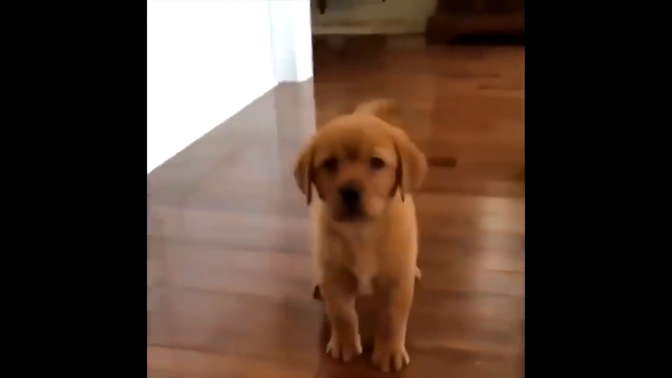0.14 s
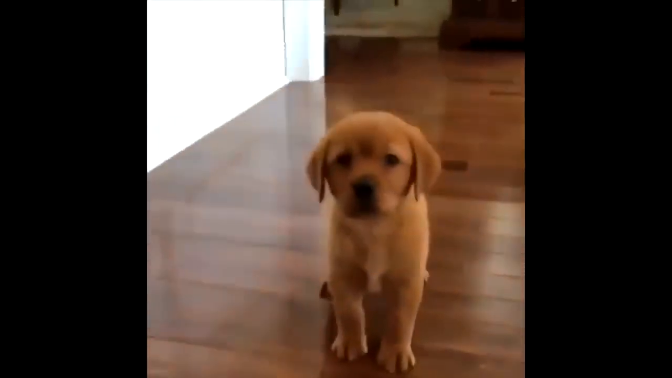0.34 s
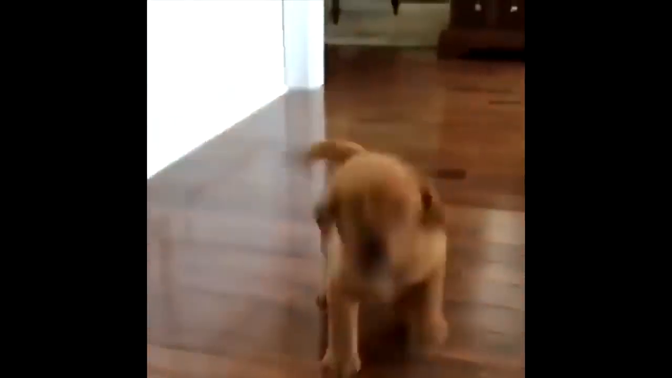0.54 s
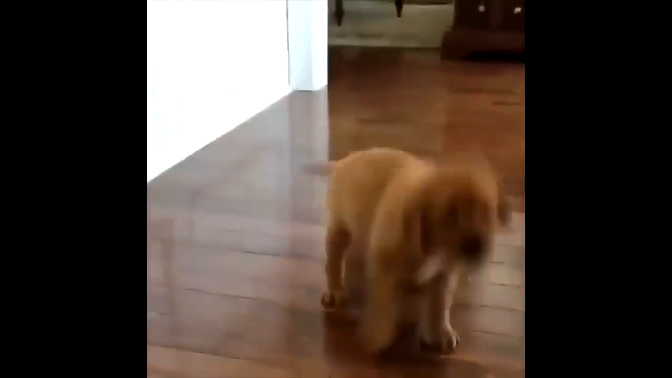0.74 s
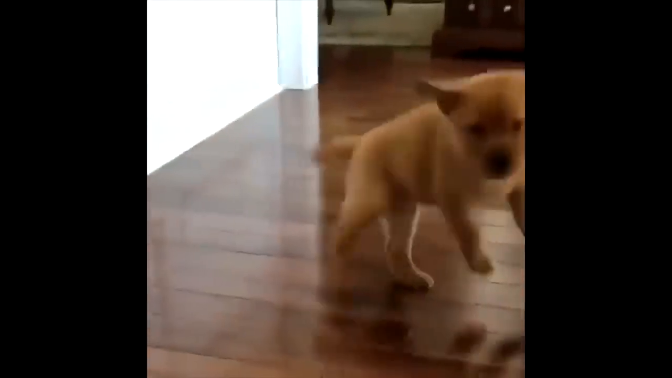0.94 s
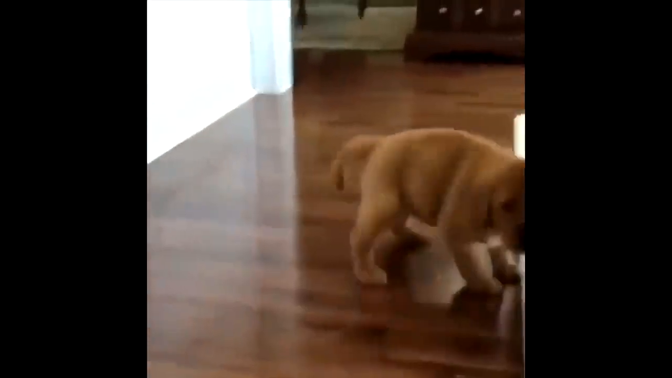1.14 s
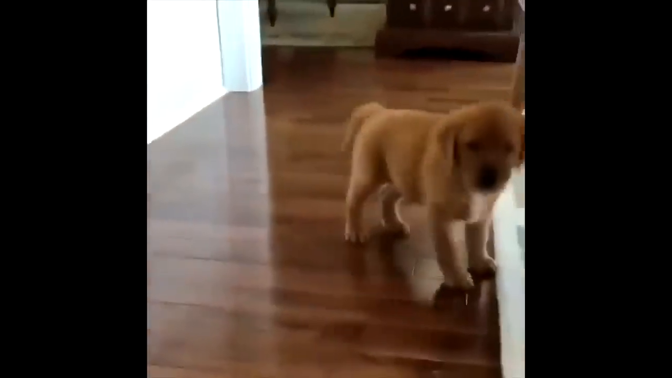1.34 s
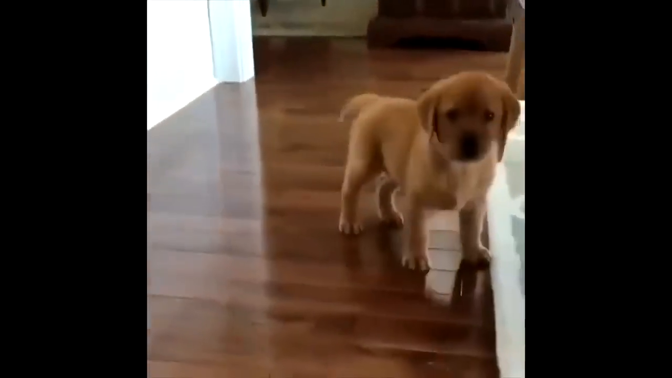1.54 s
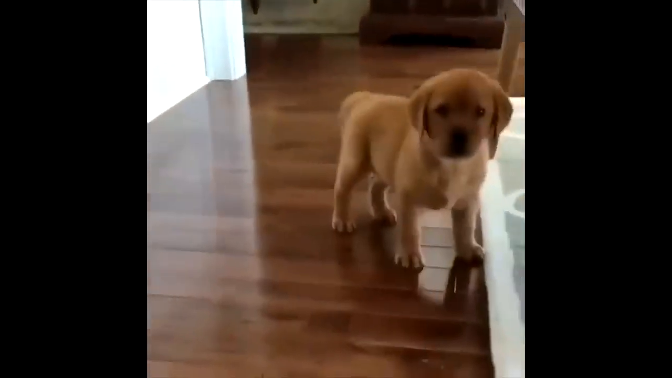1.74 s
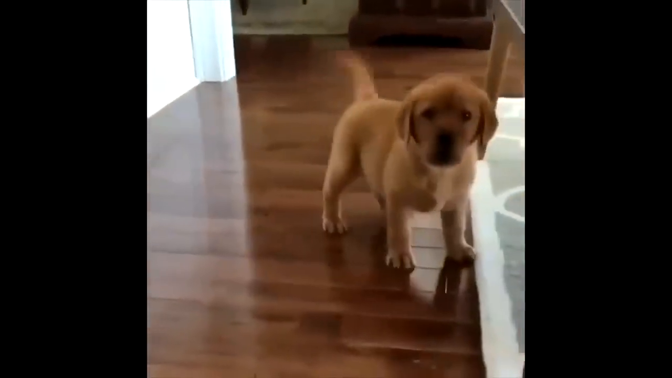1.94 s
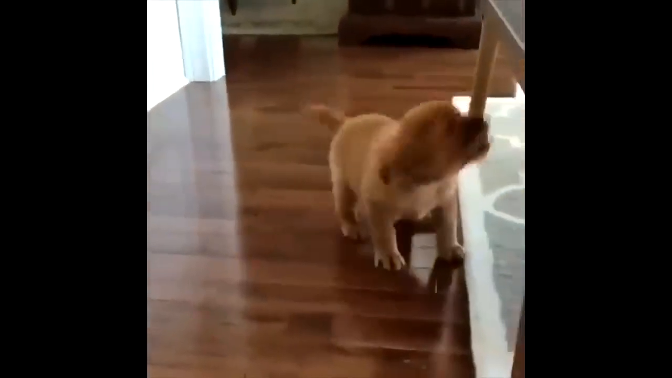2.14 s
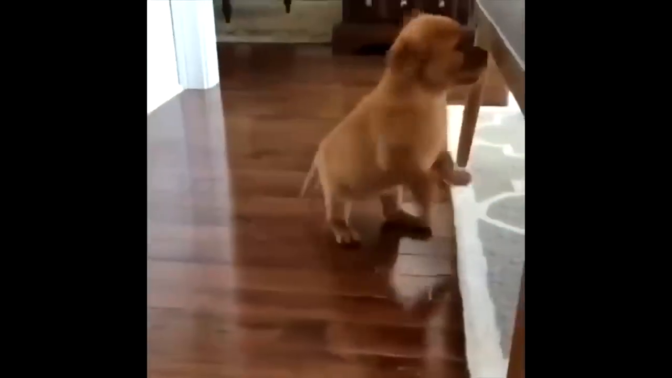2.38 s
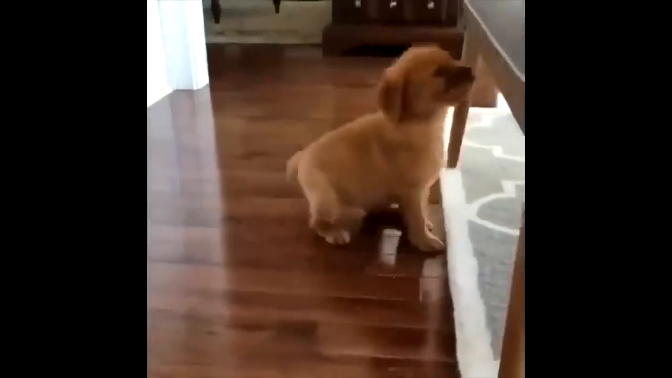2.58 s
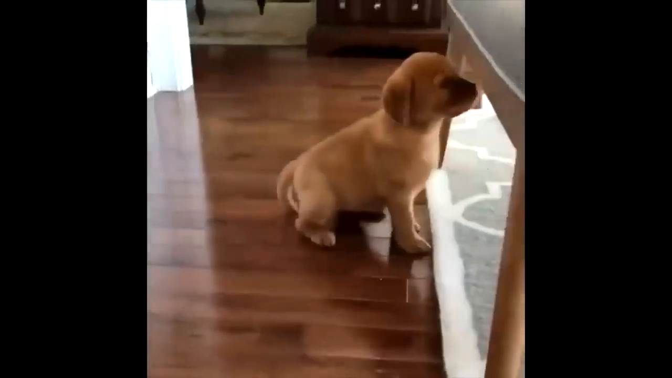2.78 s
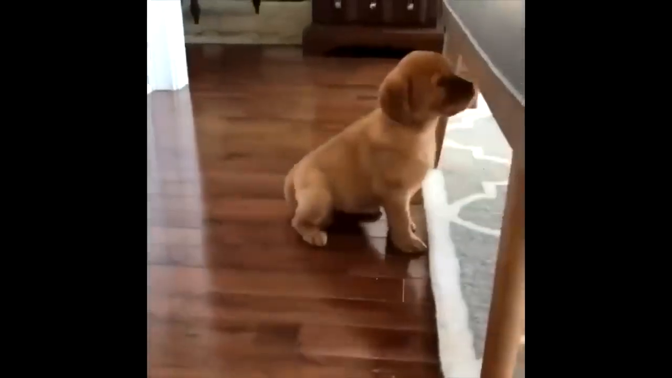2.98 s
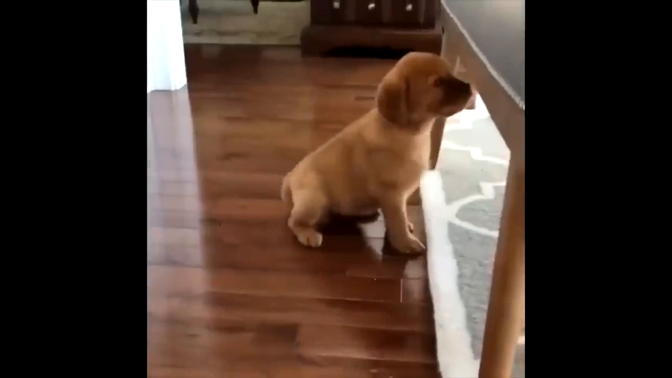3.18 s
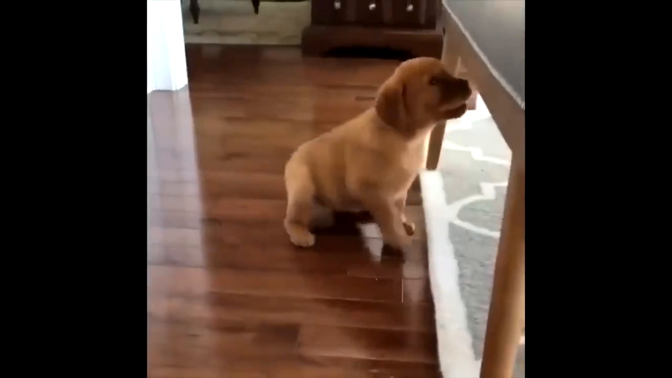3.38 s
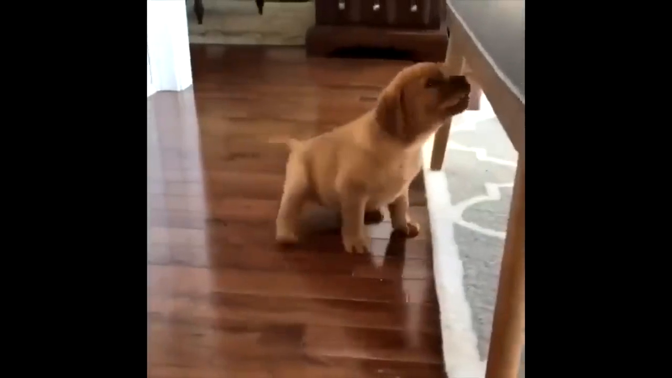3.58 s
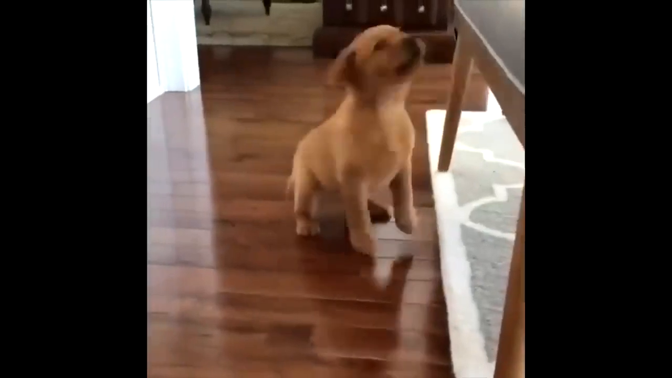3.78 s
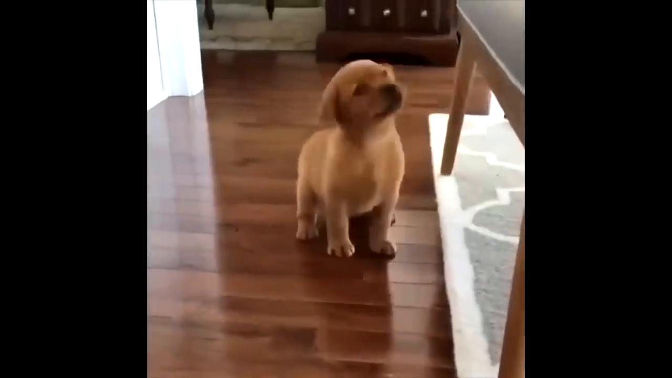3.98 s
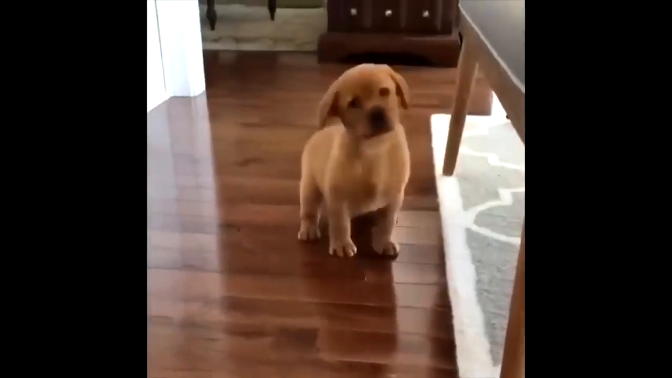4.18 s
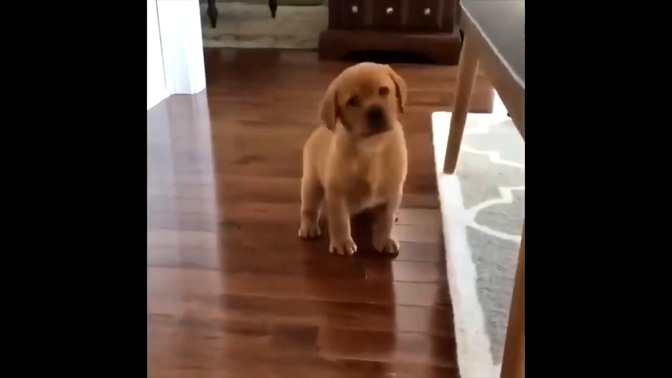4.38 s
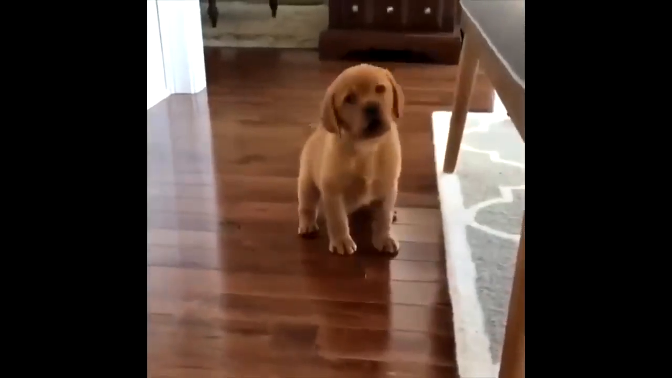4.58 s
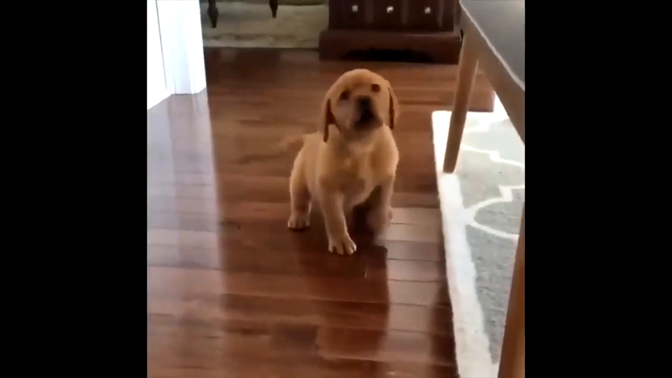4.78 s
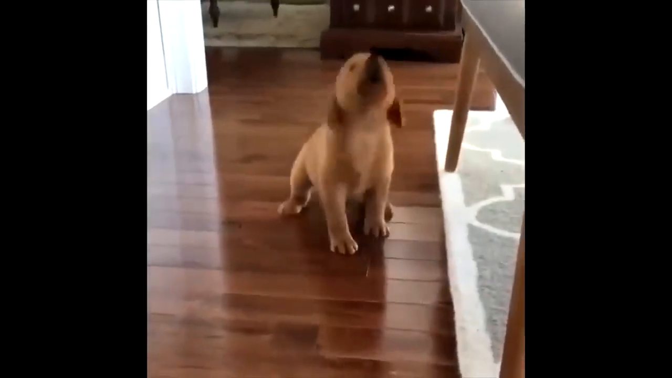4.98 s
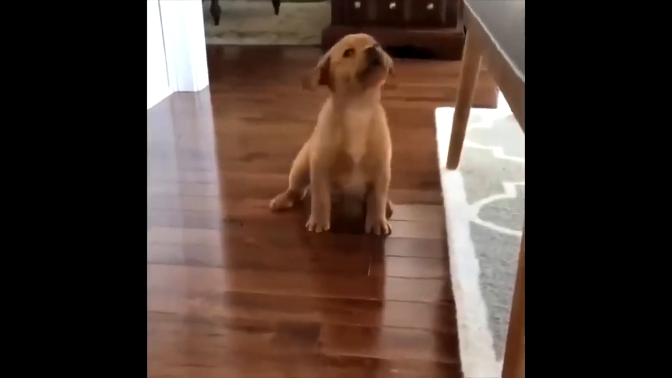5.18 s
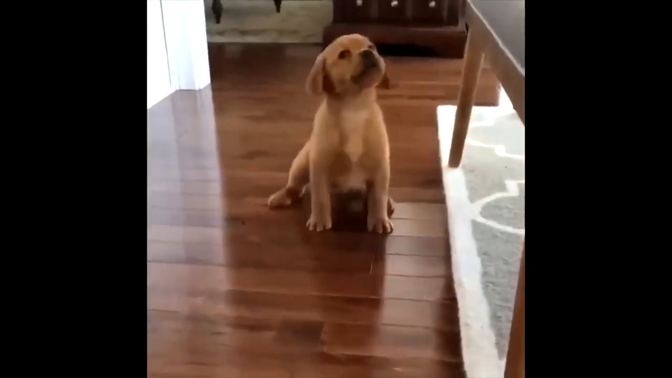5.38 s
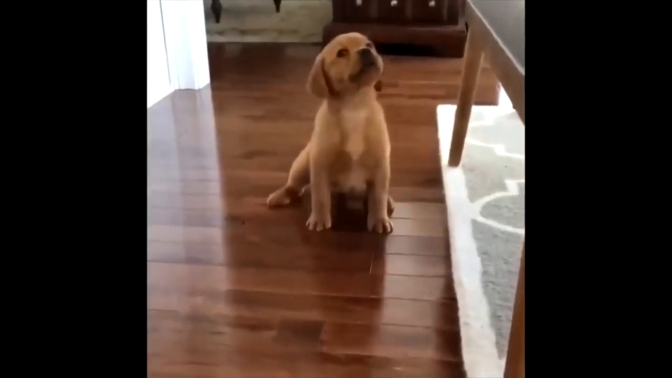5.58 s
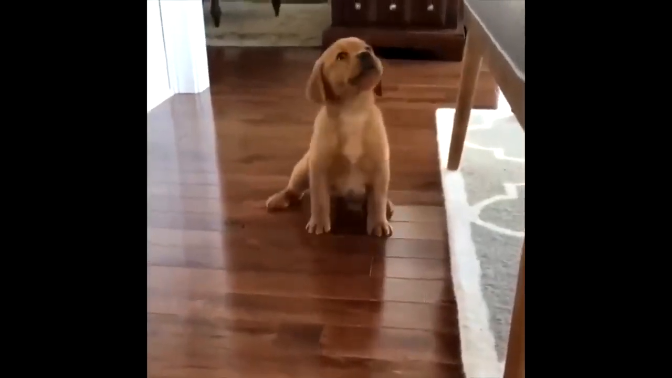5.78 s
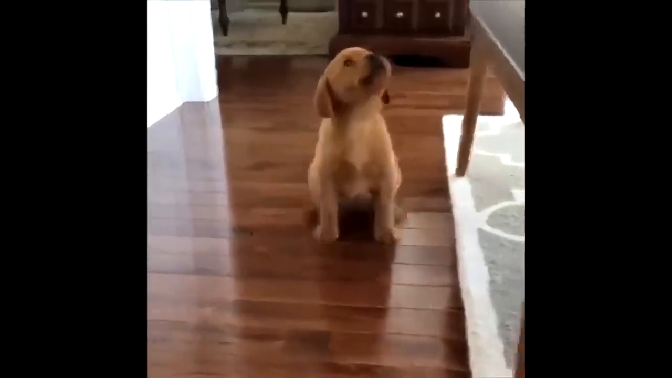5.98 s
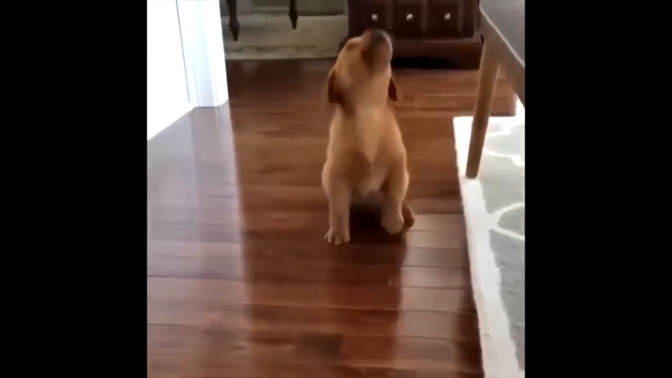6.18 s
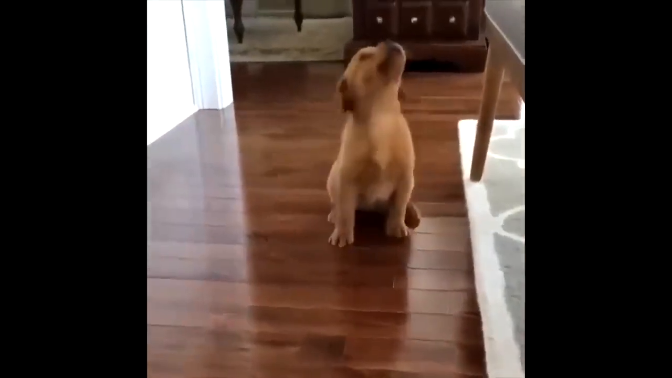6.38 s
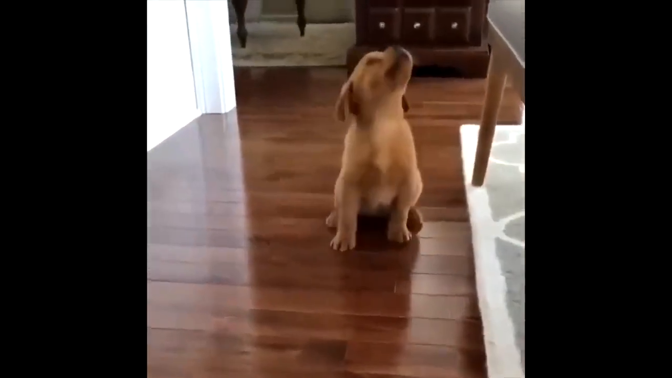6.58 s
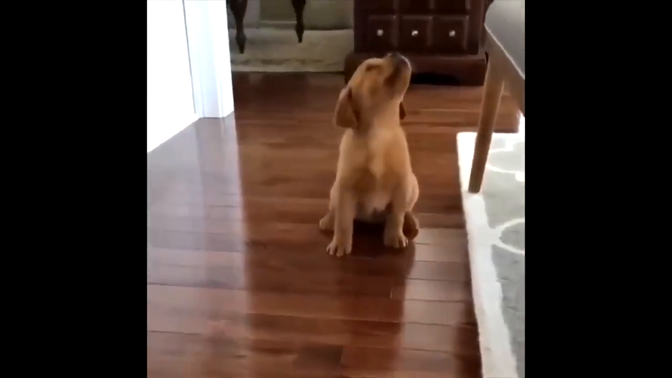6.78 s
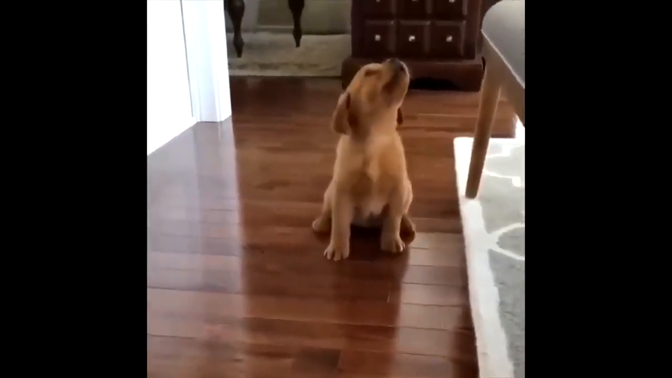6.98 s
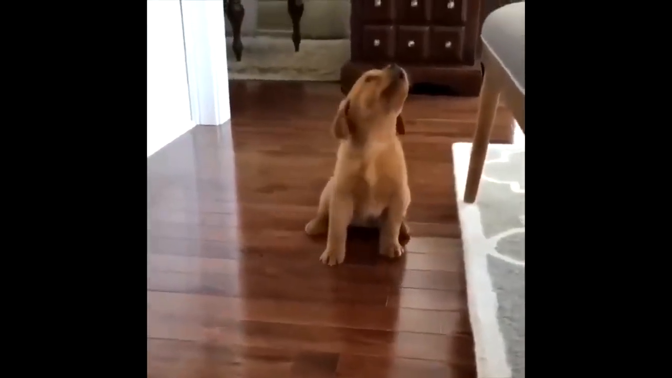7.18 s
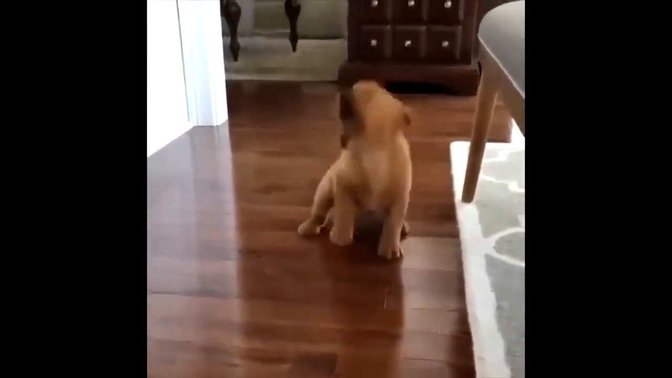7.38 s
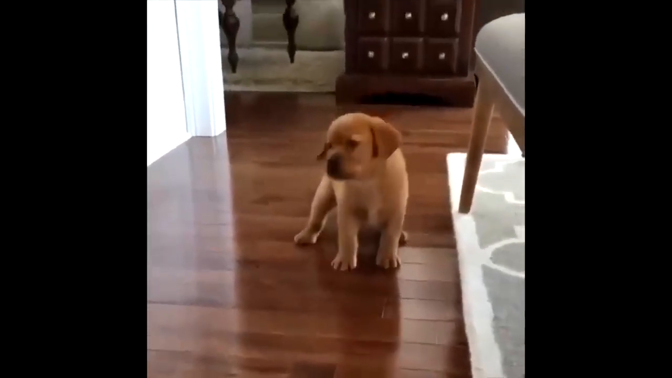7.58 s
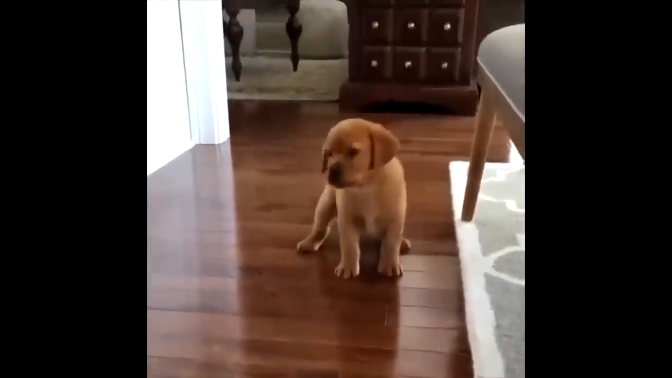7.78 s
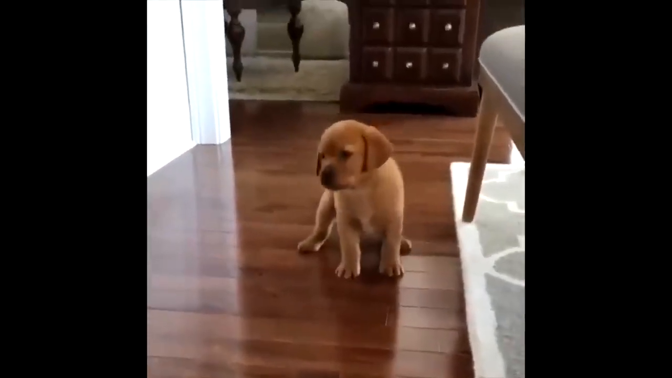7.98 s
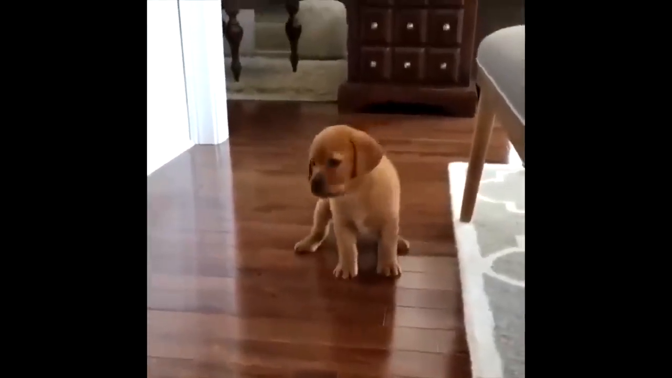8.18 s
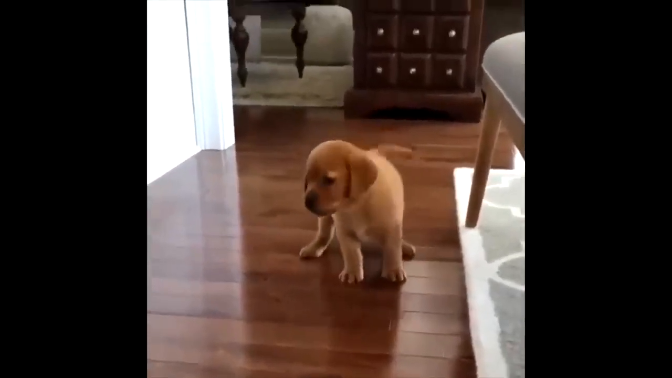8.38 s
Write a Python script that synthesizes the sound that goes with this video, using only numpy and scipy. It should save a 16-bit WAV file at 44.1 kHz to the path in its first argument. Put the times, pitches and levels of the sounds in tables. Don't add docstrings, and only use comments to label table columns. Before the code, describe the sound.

A low, faint house hum and soft hiss run throughout in a reflective room with a wooden floor. At 0.7 s a cluster of claw ticks and a pad scuff lead to a puppy's first bark at 0.8, hoarse and bright, its pitch jumping upward midway. Paws resettle quietly around 1.2 to 1.5. A sharp claw click at 2.2 precedes a high, quickly fading yap at 2.35. At 3.5 comes a tiny muffled whimper with a claw tap, then a swelling bark at 3.8. Another click and small thud at 4.85 precede a strong bark at 5.1. From 5.6 a quiet chesty growl rattles slowly, with a faint sniff near 6.0, then speeds into the fifth bark at 6.2. Paws slide softly at 7.1 to 7.3, and the last, longest bark peaks sharply at 7.6. Each bark lasts about a fifth of a second and leaves a short room tail.

```python
import sys
import numpy as np
from scipy import signal
from scipy.fft import rfft, irfft, next_fast_len
from scipy.io import wavfile
from scipy.ndimage import uniform_filter1d, minimum_filter1d, map_coordinates

SR = 44100
rng = np.random.default_rng(int(sys.argv[2]) if len(sys.argv) > 2 else 0)


def voltage_ratio(level):
    return 10 ** (np.asarray(level, float) / 20)


def dump(signal):
    limited = np.clip(np.atleast_2d(signal).T, -1, 1)
    pcm = np.round(limited * 32767).astype(np.int16)
    wavfile.write(sys.argv[1], SR, pcm)


N = 372201


def unit(x):
    return x / np.sqrt(np.mean(x ** 2) + 1e-20)


def along(points, hz):
    f, v = np.transpose(points)
    return np.interp(np.log(hz + 1), np.log(f + 1), v)


def wobble(length, rate):
    knots = rng.standard_normal(int(length * rate / SR) + 4)
    return map_coordinates(knots, [np.arange(length) * rate / SR])


def filtered(x, response):
    m = next_fast_len(len(x) + SR // 4)
    return irfft(rfft(x, m) * response(np.fft.rfftfreq(m, 1 / SR)), m)[:len(x)]


def peak(f, hz, width_hz):
    return 1j * f * width_hz / (hz * hz - f * f + 1j * f * width_hz)


def body(modes, soft_hz):
    return lambda f: sum(voltage_ratio(db) * peak(f, hz, w) for hz, w, db in modes) / (1 + 1j * f / soft_hz) ** 3


def add(track, s, x):
    spot = track[round(s * SR):][:len(x)]
    spot += x[:len(spot)]


def room(x, wet_db):
    # (frequency [Hz], t60 [s])
    decay = [(150, 0.86), (500, 0.77), (950, 0.75), (2000, 0.71), (2700, 0.59), (3300, 0.41), (4600, 0.41),
             (6000, 0.29), (10000, 0.41)]
    hz, t, z = signal.stft(rng.standard_normal(SR), SR, nperseg=256)
    fade = voltage_ratio(-60 * t / along(decay, hz)[:, None])
    tail = signal.istft(z * fade, SR, nperseg=256)[1]
    tail = tail * (1 - np.exp(-np.arange(len(tail)) / (0.004 * SR)))
    tail = voltage_ratio(wet_db) * tail / np.linalg.norm(tail)
    tail = np.pad(tail, (round(0.0066 * SR), 0))
    return signal.fftconvolve(x, tail) + np.pad(x, (0, len(tail) - 1))


def house():
    # (frequency [Hz], density [dB per Hz])
    spectrum = [(13, -47), (22, -27), (53, -4.5), (86, -7), (347, -12.5), (468, -23.5), (508, -15),
                (551, -21), (786, -22.5), (2040, -28), (2280, -31), (12700, -40.5), (15000, -53.5)]
    # (frequency [Hz], level [dB])
    tones = [(59.2, -70), (269.2, -80.5), (349.9, -77), (511.4, -74.5)]
    z = signal.stft(rng.standard_normal(N), nperseg=512)[2]
    patches = uniform_filter1d(rng.standard_normal(z.shape), 6, 0)
    patches = uniform_filter1d(patches, 14, 1)
    noise = signal.istft(z * voltage_ratio(0.5 * unit(patches)), nperseg=512)[1][:N]
    out = voltage_ratio(-65) * unit(filtered(noise, lambda f: voltage_ratio(along(spectrum, f))))
    t = np.arange(N) / SR
    for hz, db in tones:
        level = voltage_ratio(db + 2.5 * wobble(N, 2.7))
        out = out + level * np.sin(2 * np.pi * hz * t + .5 * wobble(N, 2.6))
    return out


def paws():
    # (time [s], peak level [dB], ring [Hz], board thud [dB])
    steps = [(0.725, -28.5, 1120, -7), (0.74, -25, 1010, -7), (0.747, -24.5, 988, -13),
             (0.784, -27.5, 2120, -32.5), (1.203, -37, 968, -34), (1.269, -36.5, 1643, -13),
             (1.49, -55, 1070, -14.5), (2.165, -37, 4360, -10), (2.193, -19.5, 1670, -32),
             (3.548, -28, 1268, -15), (4.845, -33, 4260, -7.5), (4.849, -22.5, 1240, -15),
             (7.096, -38.5, 1130, -22)]
    # (time [s], length [s], level [dB], centre [Hz])
    scuffs = [
        (.72, 0.04, -45, 2503),
        (1.2, .1, -56, 6000),
        (2.195, .04, -52.5, 2720),
        (3.545, 0.041, -55, 3000),
        (4.84, 0.035, -50, 4200),
        (6, 0.13, -67, 1100),
        (7.09, 0.059, -53, 1600),
        (7.24, 0.068, -57.5, 2350),
        (7.235, 0.091, -62.5, 8000),
    ]
    # (frequency [Hz], width [Hz], level [dB])
    board = [(151, 360, 12), (324.5, 87, -6)]
    tick_s, crack_db = .032, -15
    out, t = np.zeros(N), np.arange(SR // 8) / SR
    for s, db, hz, thud_db in steps:
        fade = voltage_ratio(-60 * t / tick_s) * (1 - np.exp(-t / .0007))
        burst = unit(rng.standard_normal(len(t)))
        claw = lambda f: peak(f, hz, .25 * hz) - .5 * peak(f, 1.6 * hz, 350) + .2 * peak(f, 2.4 * hz, 900)
        ring = unit(filtered(burst, claw))
        crack = unit(filtered(burst, lambda f: peak(f, hz + 1200, 2900)))
        tick = fade * (.7 * ring + voltage_ratio(crack_db) * crack)
        thud = voltage_ratio(thud_db + 35.0) * filtered(1. * (t == 0), body(board, soft_hz=450))
        add(out, s, room(voltage_ratio(db) * (tick + thud), wet_db=-6))
    for s, length, db, hz in scuffs:
        swell = np.sin(np.pi * np.clip(t / length, 0, 1) ** 0.52) * voltage_ratio(1 * wobble(len(t), 300))
        rings = hz * np.array([.5, .7, 1, 1.5, 1.8]) * rng.uniform(.95, 1.05, 5)
        colour = lambda f: .15 * peak(f, hz, 4000) + sum(peak(f, r, .1 * r) for r in rings)
        hiss = unit(filtered(rng.standard_normal(len(t)), colour))
        add(out, s, room(voltage_ratio(db) * swell * hiss, wet_db=-10))
    return out


def growl():
    # (time [s], slap rate [Hz], level [dB])
    course = [
        (5.634, 26.3, -57),
        (5.8, 26.3, -55),
        (5.95, 24, -52),
        (6.062, 28, -47.5),
        (6.098, 36, -49.5),
        (6.121, 170, -51),
        (6.189, 250, -40.5),
        (6.226, 380, -41.5),
    ]
    # (frequency [Hz], width [Hz], level [dB])
    chest = [(188, 86, 2), (408.6, 120, 3), (990, 28, 2.5), (1170, 99, -1)]
    s, rate, db = np.transpose(course)
    t = np.arange(s[0], s[-1] + .05, 1 / SR)
    uneven = 1 + .04 * wobble(len(t), 30) + .2 * wobble(len(t), 200)
    count = np.cumsum(np.interp(t, s, rate) * uneven) / SR
    slaps = np.diff(np.floor(count), prepend=0) * voltage_ratio(np.interp(t, s, db, right=-120) + 51.5)
    slaps = slaps * voltage_ratio(2 * wobble(len(t), 57))
    flaps = (rng.random(260) < .012) * .35 + (np.arange(260) == 0)
    slaps = signal.fftconvolve(slaps, flaps)[:len(t)]
    out = np.zeros(N)
    add(out, s[0], room(filtered(slaps, body(chest, soft_hz=450)), wet_db=-5))
    return out


def breath(rows, catch, rise, fall, open_hz, closing_hz, close_s):
    rise_db, fall_db = 32, 29.5
    slack_in, slack_out = .8, 0.7
    loose = 0.11
    snap_s, settle_db_per_s = .025, 41.5
    gape = 0.33
    times, pitch, effort_db = np.transpose([rows[0], *rows, rows[-1]])
    times[[0, -1]] += [-rise, fall]
    pitch[[0, -1]] *= [slack_in, slack_out]
    effort_db[[0, -1]] -= [rise_db, fall_db]
    s = np.linspace(times[0], times[-1], num=200)
    pitch, effort_db = np.interp(s, times, pitch), np.interp(s, times, effort_db)
    first_db, catch_s, after_db, mouth_db, muffle_db = catch
    rasp_db = np.interp(s - times[1], [catch_s - snap_s, catch_s, catch_s + 1],
                        [first_db, after_db, after_db - settle_db_per_s])
    slack_db = np.minimum(effort_db.max() - effort_db, 20)
    rasp_db = rasp_db + loose * slack_db * (s > times[1] + catch_s)
    voice_db = effort_db - 10 * np.log10(1 + voltage_ratio(2 * rasp_db))
    closed = np.clip((s - times[1]) / close_s, 0, 1)
    mouth_hz = open_hz + (closing_hz - open_hz) * closed
    mouth_db = mouth_db + gape * rasp_db - muffle_db * closed
    return np.transpose([s, pitch, voice_db, voice_db + rasp_db, mouth_hz, mouth_db])


def tract(f, mouth_hz, mouth_db, bright_db, throat_hz, throat_db):
    # (frequency [Hz], width [Hz], level [dB])
    palate = [(3520, 430, -31), (4450, 600, -23.5)]
    # (frequency [Hz], width [Hz], level [dB])
    upper = [(6500, 1100, -37), (9000, 1230, -50.5), (12400, 3300, -43)]
    ring = lambda hz, w: np.abs(peak(f, hz, w)) ** 2
    low = voltage_ratio(throat_db) * ring(throat_hz, 470) / (1 + (0.61 * throat_hz / (f + 1)) ** 8)
    mouth = ring(mouth_hz, 430) + voltage_ratio(-8.5) * ring(1.6 * mouth_hz, 490) + voltage_ratio(-12) * ring(2300, 300)
    roof = sum(voltage_ratio(db + bright_db) * ring(hz, w) for hz, w, db in palate)
    mouth = mouth + roof / (1 + (f / 4900) ** 24)
    head = sum(voltage_ratio(db + bright_db) * ring(hz, w) for hz, w, db in upper)
    return np.sqrt(low ** 2 + (voltage_ratio(mouth_db) * mouth) ** 2 + head ** 2)


def call(rows, jitter, half_db, bright_db, throat_hz):
    # (frequency [Hz], width [Hz], level [dB])
    humming = (160, 200, -23.5)
    s, *cols = np.transpose(rows)
    t = np.arange(s[0], s[-1], 1 / SR)
    pitch, voice_db, rasp_db, mouth_hz, mouth_db = (np.interp(t, s, c) for c in cols)

    strain = np.clip(1.6 * voltage_ratio(rasp_db - voice_db), .5, 3.5)
    shaken = pitch * (1 + jitter * strain * wobble(len(t), 200))
    turn = np.pi * np.cumsum(shaken) / SR
    k = np.arange(1, 21)[:, None]
    line_hz = k * pitch / 2
    size = tract(line_hz, mouth_hz, mouth_db, bright_db, throat_hz, 0)
    size = size * voltage_ratio(half_db * (k % 2) + 2.1 * (k == 2))
    size = size / np.sqrt(1 + (line_hz / 2800) ** 6)
    shimmer = voltage_ratio(4.2 * np.array([wobble(len(t), 80) for _ in k]) * (k != 2))
    lines = np.sin(k * turn + rng.uniform(0, 2 * np.pi, k.shape))
    voice = np.sqrt(2) * np.sum(size * shimmer * lines, axis=0)

    puffs = (1 + .5 * np.cos(turn)) * voltage_ratio(1.2 * wobble(len(t), 150))
    air = unit(rng.standard_normal(len(t)) * puffs)
    hz, frame, z = signal.stft(air, SR, nperseg=256)
    frame_hz, frame_db = np.interp(frame + s[0], t, mouth_hz), np.interp(frame + s[0], t, mouth_db)
    shape = tract(hz[:, None], frame_hz, frame_db, bright_db + 3.5, throat_hz, -4.5)
    shape = shape / np.sqrt(np.mean(shape ** 2, axis=0))
    rasp = signal.istft(z * shape, SR, nperseg=256)[1][:len(t)]

    wander = .9 * wobble(len(t), 120)
    flutter_db = 3 * wobble(len(t), 90)
    edge = np.clip(np.minimum(t - s[0], s[-1] - t) / 0.01, 0, 1)
    sag_db = 9 * (t - s[0]) / (s[-1] - s[0])
    chest = edge * voltage_ratio(0.11 * voice_db + humming[2] - sag_db + flutter_db)
    chest = chest * np.abs(peak(pitch / 2, *humming[:2])) ** 3 * np.sin(turn + wander)
    return voltage_ratio(voice_db) * voice + voltage_ratio(rasp_db) * rasp + chest


def barks():
    # (time [s], pitch [Hz], effort [dB])
    curves = [
        [(.813, 520, -10.5), (.848, 713, -8.5), (.878, 721, -12), (.89, 1042, -15.5), (.912, 1074, -12.5),
         (.938, 664, -14)],
        [(2.352, 851, -13.5), (2.37, 845.4, -13), (2.4, 938, -13.5), (2.435, 905, -11.5), (2.46, 711.8, -20.5),
         (2.485, 685, -23)],
        [(3.805, 600, -20.5), (3.835, 863, -10.5), (3.875, 959, -8), (3.9, 910, -7.5), (3.925, 880.3, -18),
         (3.96, 777, -22.5)],
        [(5.1, 701, -16), (5.12, 963, -8.5), (5.15, 977, -7.5), (5.205, 904, -14), (5.218, 881, -21),
         (5.24, 681, -30.5)],
        [(6.215, 550, -23), (6.25, 796.7, -9), (6.262, 915, -8), (6.3, 886.4, -7), (6.314, 861.7, -15.5),
         (6.336, 783.5, -16), (6.36, 705, -18)],
        [(7.5, 508, -21.5), (7.53, 777, -13.5), (7.572, 888.3, -10.5), (7.604, 971, -2), (7.613, 971.4, -21),
         (7.62, 1130, -9), (7.63, 977.7, -10), (7.645, 953.4, -17), (7.67, 742, -19.5)],
    ]
    # (halfway lines [dB], brightness [dB], throat resonance [Hz])
    manners = [(-3, 10, 904), (-20.5, -5, 823), (-6.5, -3, 930), (0, 1.5, 940), (-4, 1, 890),
               (-10.5, 3.5, 930)]
    jitters = [.03, .02, .013, .009, .008, .009]
    # (rise [s], fall [s], open mouth [Hz], closing mouth [Hz], closing time [s])
    jaws = [(0.0089, 0.029, 2150, 1700, 0.087), (.007, .055, 1767, 1500, .11),
            (.022, 0.068, 1700, 1200, 0.095), (.015, 0.067, 1950, 1200, .05), (.035, .06, 1400, 1330, .05),
            (0.029, 0.031, 1800, 1680, .045)]
    # (rasp over voice at first [dB], catching time [s], rasp over voice after [dB],
    # mouth strength [dB], muffling by the closing jaw [dB])
    catches = [(8.5, 0.045, -1.5, 5.5, 8), (14, .06, -5.5, -1.5, 6), (9, .06, -7.5, -3, 8),
               (13.5, 0.038, -6, -0.5, 8.5), (7, .05, -6.5, -2.5, 3), (12, .042, -7, 4.5, 7.5)]
    # (time [s], pitch [Hz], effort [dB])
    whimper_curve = [(3.505, 682.6, -52.5), (3.54, 623, -42.5)]
    whimper_jaw = (0.017, 0.021, 1100, 570, 0.054)
    whimper_catch = (-2.5, .03, -6, 4, 1)
    out = np.zeros(N)
    for curve, catch, jaw, jitter, manner in zip(curves, catches, jaws, jitters, manners):
        rows = breath(curve, catch, *jaw)
        add(out, rows[0][0], room(call(rows, jitter, *manner), wet_db=-12.5))
    rows = breath(whimper_curve, whimper_catch, *whimper_jaw)
    whimper = call(rows, jitter=.035, half_db=-15.5, bright_db=5.0, throat_hz=600)
    whimper = filtered(whimper, lambda f: 1 / (1 + (f / 1600) ** 10))
    add(out, rows[0][0], room(whimper, wet_db=-9.5))
    return out


def scene():
    return (house() + paws() + growl() + barks())[None]


def roll_off(x):
    return signal.sosfilt(signal.butter(12, 15140, fs=SR, output="sos"), x)


def record(dry):
    # (frequency [Hz], density [dB per Hz])
    haze = [(2500, -57.5), (3200, 1.5), (7000, -4), (13500, -6.5)]
    x = dry[0]
    level = np.sqrt(np.abs(uniform_filter1d(filtered(x, lambda f: f > 600) ** 2, round(.04 * SR))))
    gate = uniform_filter1d(1. * (level > voltage_ratio(-49)), round(0.011 * SR))
    hiss = unit(filtered(rng.standard_normal(N), lambda f: voltage_ratio(along(haze, f))))
    x = x + gate * voltage_ratio(-66.0) * hiss
    span = round(0.00067 * SR)
    gain = minimum_filter1d(1 / np.maximum(np.abs(x), 1), 2 * span)
    x = x * uniform_filter1d(gain, span)
    x = filtered(x, lambda f: (f < 13950) / (1 + (35 / (f + 1)) ** 4))
    return roll_off(x)


dry = scene()
out = record(dry)
dump(out)
```